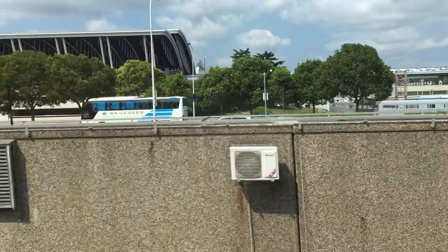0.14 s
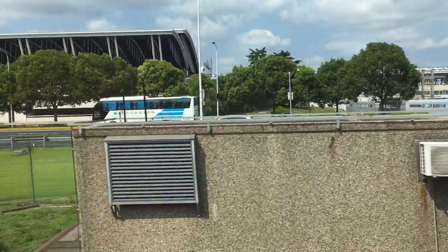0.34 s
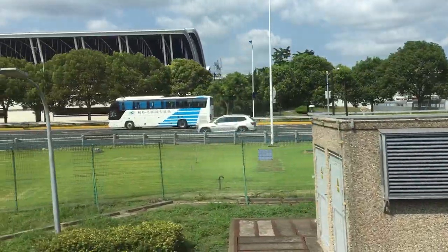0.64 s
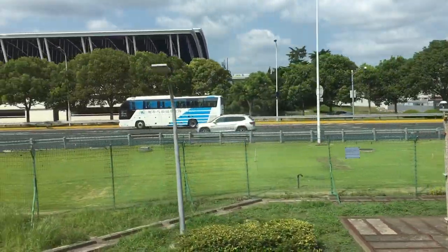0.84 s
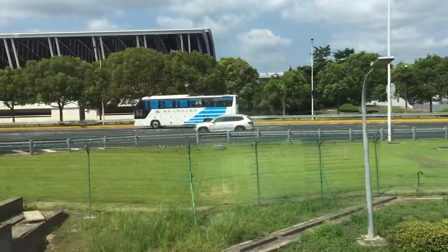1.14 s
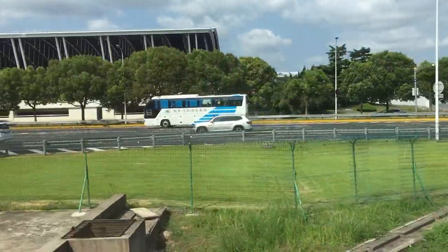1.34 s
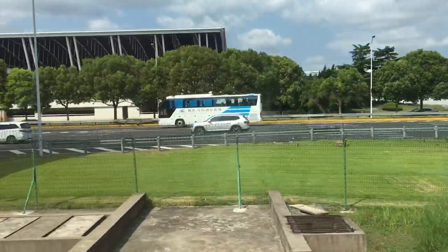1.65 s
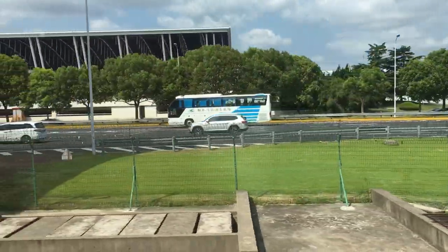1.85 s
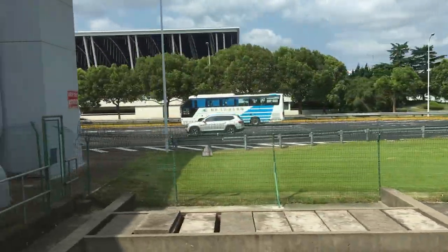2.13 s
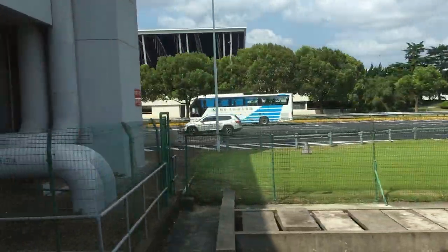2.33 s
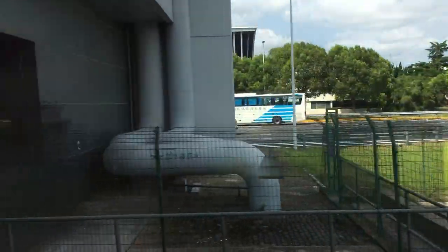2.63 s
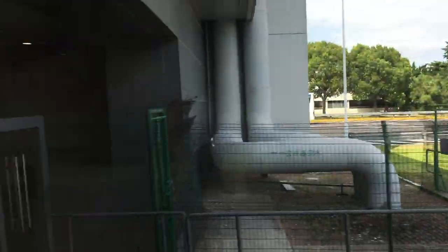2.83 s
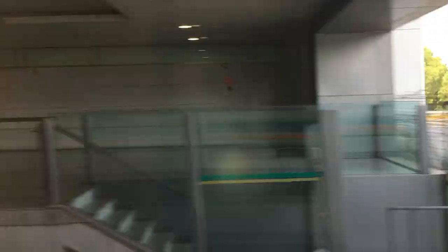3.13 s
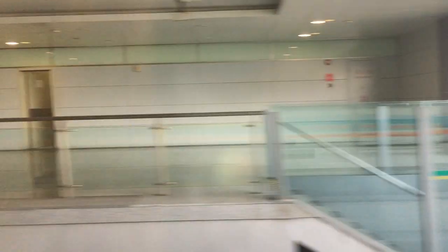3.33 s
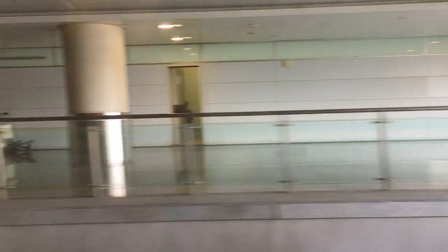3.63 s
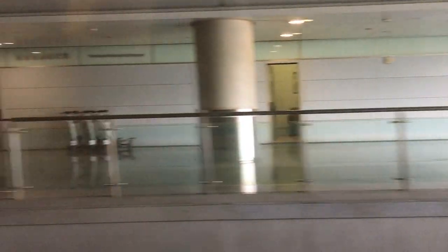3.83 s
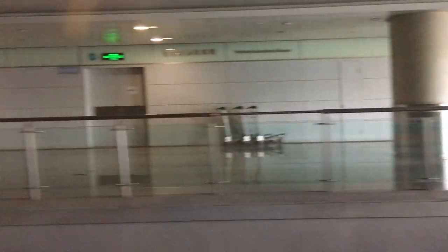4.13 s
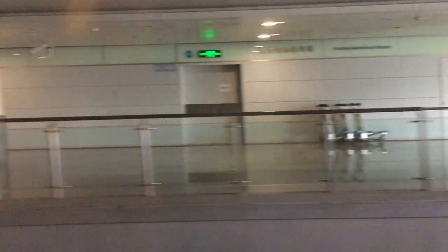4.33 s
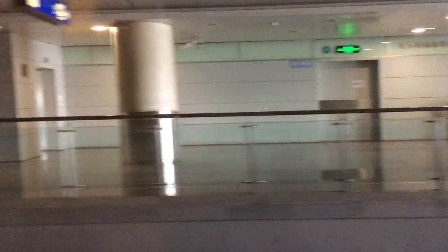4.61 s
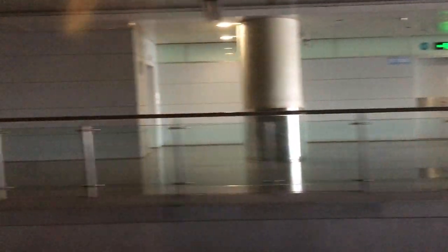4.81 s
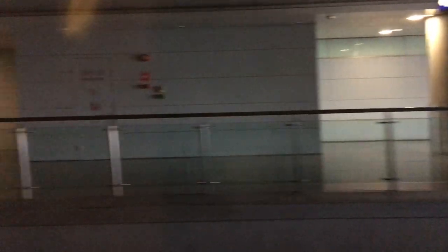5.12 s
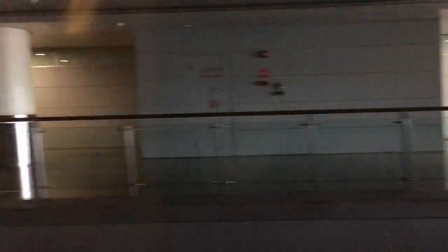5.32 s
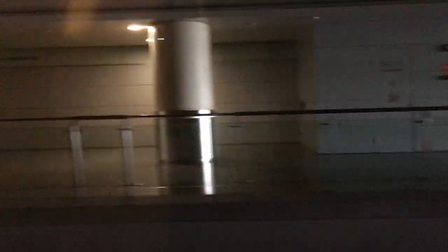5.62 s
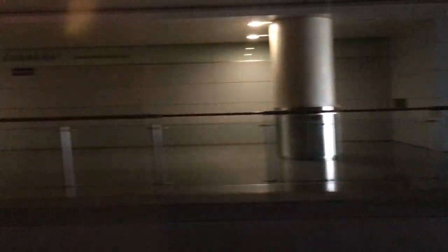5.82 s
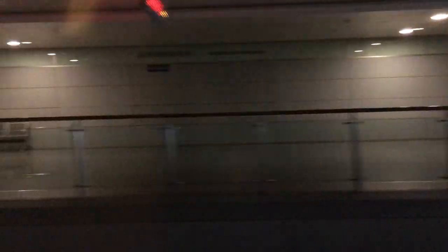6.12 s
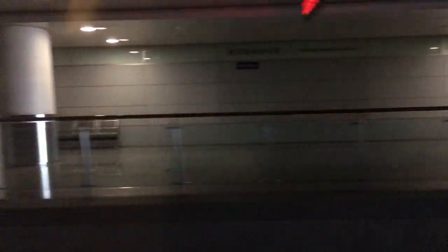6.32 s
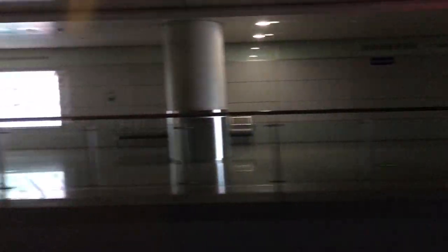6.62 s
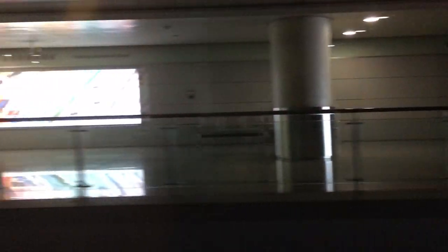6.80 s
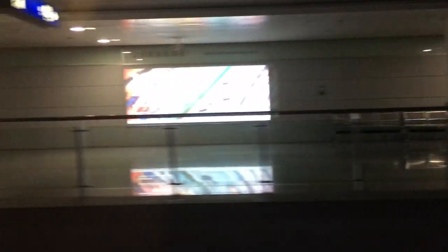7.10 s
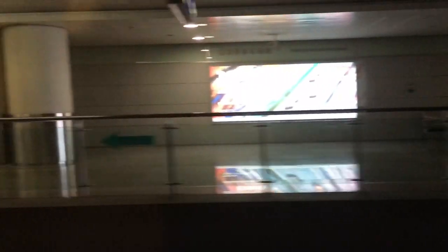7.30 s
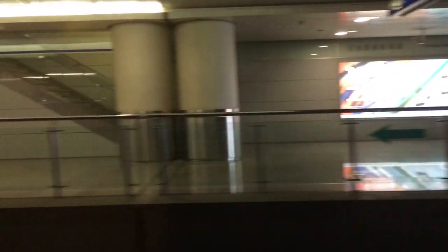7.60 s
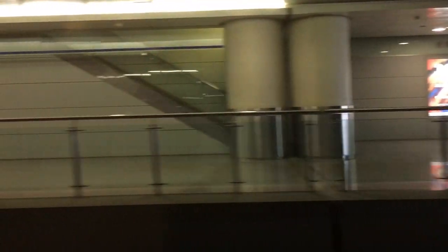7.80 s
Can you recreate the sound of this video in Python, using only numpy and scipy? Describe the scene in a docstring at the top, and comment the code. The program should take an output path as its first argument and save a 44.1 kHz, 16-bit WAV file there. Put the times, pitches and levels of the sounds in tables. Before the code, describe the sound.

The sound is heard from inside a magnetically levitated train carriage as it brakes into a station. From 0 seconds a deep floor rumble, strongest in the low bass, sits with nearly steady, dull cabin air. Over it a low hum falls slowly and smoothly in pitch, by roughly a quarter over the eight seconds. A trim panel gives very faint, short, high squeaks about a dozen times a second, varying in strength. Light cloth rustles appear at 0.6 and 1.5 seconds. At about 2.3 the panel slides a little longer, its thin tone rising, followed by a cluster of crisp fabric rubs until 2.6. From about 2.5 to 4.5 station walls throw back a swelling, muffled rush, which then stays, easing slightly after 6. The hum grows more unsteady, pulsing and dipping, especially after 4. Scattered close rustles and snaps continue until the end, with the train still moving.

```python
"""Inside a magnetically levitated train braking into a station, heard at one microphone in the carriage.
From the start the floor rumbles over cabin air noise, and the guideway's stator slots hum at a falling
pitch, as sine orders; a trim panel squeaks a dozen times a second in short tones, and cloth close to the
microphone rustles in shaped noise. At 2.3 s the panel slides for longer. Over the first five seconds the
station walls throw back ever more running noise, filtered hiss, and the hum grows more unsteady."""
import sys
import numpy as np
from scipy import signal
from scipy.fft import rfft, irfft, next_fast_len
from scipy.io import wavfile
from scipy.ndimage import uniform_filter1d, map_coordinates

SR = 44100
rng = np.random.default_rng(int(sys.argv[2]) if len(sys.argv) > 2 else 0)


def decibels_to_gain(level_db):
    """Convert a level in decibels to a linear amplitude gain (20 dB per decade)."""
    exponent = np.asarray(level_db, float) / 20
    return 10 ** exponent


def generate_wav(signal):
    """Clip the signal to [-1, 1] and save it as 16-bit WAV at the path in sys.argv[1]."""
    frames = np.transpose(np.atleast_2d(signal))
    scaled = np.clip(frames, -1, 1) * 32767
    pcm = np.round(scaled).astype(np.int16)
    wavfile.write(sys.argv[1], SR, pcm)


N = 350594

# Running noise thrown back by the station walls. Each row: time in seconds, level in dB.
WALL_LEVEL = [(0, -71.5), (2.5, -51), (3, -47.5), (3.5, -42.5), (4, -40.5), (4.5, -37.5), (5, -38),
              (5.5, -38), (6, -39), (6.5, -42.5), (7, -42), (7.5, -44.5), (7.95, -42)]
SQUEAK_HZ = 4350


def unit(x):
    """Scales a sound to rms 1."""
    return x / np.sqrt(np.mean(x ** 2) + 1e-20)


def curves(rows):
    """Draws one value per sample for each column after the time."""
    s, *columns = np.transpose(rows)
    t = np.arange(N) / SR
    return np.array([np.interp(t, s, column) for column in columns])


def wobble(rate):
    """Draws a smooth random curve through rate random knots a second."""
    knots = rng.standard_normal(int(N * rate / SR) + 4)
    return map_coordinates(knots, [np.arange(N) * rate / SR])


def rush(tone, n=N, peak_hz=1000, peak_db=0):
    """Noise of rms 1 with the given spectrum and one resonant peak."""
    m = next_fast_len(n + 8192)
    octave = np.log2(np.fft.rfftfreq(m, 1 / SR) + 1)
    hz, db = np.transpose(tone)
    width = .16 / (1 + abs(peak_db) / 12)  # octaves; a taller peak is narrower
    peak = peak_db / (1 + ((octave - np.log2(peak_hz)) / width) ** 2)
    shape = np.interp(octave, np.log2(hz), db) + peak
    noise = rng.standard_normal(m)
    return unit(irfft(rfft(noise) * decibels_to_gain(shape), m)[:n])


def hum():
    """Magnets passing the stator slots shake the floor at the slot rate and its first multiples."""
    # Low orders before their dips. Each row: time in seconds, order 1 in dB, order 2 in dB.
    low_orders = [(0, -35.5, -44), (.4, -30, -39.5), (.7, -38.5, -35), (.9, -35.5, -41.5),
                  (1.1, -31.5, -39), (1.7, -33, -45.5), (2.2, -30.5, -39), (2.7, -27.5, -38),
                  (2.95, -29.5, -35.5), (3.15, -29, -47), (3.6, -26, -40), (3.95, -27.5, -47.5),
                  (4.1, -31.5, -31), (4.4, -25, -41), (4.65, -31.5, -34), (5.2, -22, -50.5),
                  (5.3, -36.5, -44.5), (5.45, -25.5, -36), (5.65, -30.5, -46.5), (5.8, -31, -27.5),
                  (5.95, -22, -47), (6.2, -20, -42.5), (6.7, -29, -40), (6.82, -27.5, -47.5),
                  (7, -34, -39.5), (7.2, -23.5, -40.5), (7.3, -31.5, -45.5), (7.55, -29.5, -40.5),
                  (7.8, -24, -39.5), (7.95, -29.5, -61)]
    # Orders 3 and 4. Each row: level through the floor in dB, level relative to the wall echo in dB.
    upper_orders = [(-66.5, -9.5), (-60.5, -12)]
    # Unrest of the hum, growing between the station walls.
    # Each row: time in seconds, scale of the random phase in radians (for order 1).
    unrest_rows = [(0, .2), (3, .25), (4, .4), (5.3, .8), (7.95, .8)]
    start_hz, fall_hz_per_s, ease_hz_per_s2 = 181, 6.75, .093  # the pitch falls ever more gently
    dip_db_per_rad, second_dip_db, upper_waver_db = 10, 4, 3  # order 2 dips deeper by second_dip_db

    t = np.arange(N) / SR
    slot_hz = start_hz - fall_hz_per_s * t + ease_hz_per_s2 * t ** 2
    turn = 2 * np.pi * np.cumsum(slot_hz) / SR
    unrest = curves(unrest_rows)[0]
    walls = decibels_to_gain(curves(WALL_LEVEL)[0])

    gains = []
    for k, db in enumerate(curves(low_orders)):
        depth_db = dip_db_per_rad * unrest + second_dip_db * k
        brief_dips = np.maximum(wobble(20), 0)
        gains.append(decibels_to_gain(db - depth_db * brief_dips))
    for floor_db, echo_db in upper_orders:
        level = np.hypot(decibels_to_gain(floor_db), walls * decibels_to_gain(echo_db))
        gains.append(level * decibels_to_gain(upper_waver_db * wobble(5)))

    out = np.zeros(N)
    for order, gain in enumerate(gains, start=1):
        drift = order ** .75 * unrest * wobble(8 * order)  # higher orders blur more
        flutter_db = (.8 * order + 1.2 * unrest) * np.tanh(wobble(22))
        tone = np.sin(order * turn + drift + rng.uniform(0, 2 * np.pi))
        out += np.sqrt(2) * gain * decibels_to_gain(flutter_db) * tone
    return out


def floor_rumble():
    """The carriage floor rumbles: low noise, strongest around 50 Hz, with a slowly changing level."""
    # Each row: time in seconds, level in dB.
    rumble_level = [(0, -28), (2, -29.5), (2.7, -28), (3.8, -29), (5.2, -26.5), (6.2, -29), (7.95, -29)]
    # Each row: frequency in Hz, relative density in dB per Hz.
    rumble_tone = [(20, -20.5), (28, -21.5), (40, -0.5), (50, 5.5), (65, 2.5), (90, 3.5), (120, -2.5),
                   (150, -12), (200, -28.5), (400, -120)]
    return decibels_to_gain(curves(rumble_level)[0]) * rush(rumble_tone)


def wall_echo():
    """The station walls throw the running noise back, as noise that swells with a slight waver."""
    # Each row: frequency in Hz, relative density in dB per Hz.
    wall_tone = [(150, -31), (280, 6), (450, -10.5), (620, -2), (780, -8), (1100, -7), (2000, -17),
                 (4000, -33.5), (7000, -49.5), (9000, -71), (14000, -120)]
    level_db = curves(WALL_LEVEL)[0] + .6 * wobble(5)
    return decibels_to_gain(level_db) * rush(wall_tone)


def squeaks():
    """Each sway slips the panel on its clip: a short high tone with its octave, then a weaker second slip."""
    # Marker squeaks. Each row: time in seconds, tone in dB rms, octave in dB rms, both before scatter.
    markers = [(.068, -70, -79), (.296, -68, -82), (.38, -77, -84), (.522, -80, -85), (.648, -72, -83),
               (.791, -65.5, -76), (1.172, -68, -80), (1.43, -69.5, -79), (1.92, -68, -79),
               (1.98, -71, -90), (2.209, -70, -80), (2.62, -69.5, -80), (2.773, -69, -80.5),
               (3.41, -67.5, -83), (3.545, -71, -83), (3.7, -66, -74), (3.791, -65, -78), (3.945, -66, -80),
               (4.076, -64, -82), (4.384, -77.5, -85), (4.658, -77, -80), (4.883, -65.5, -71),
               (5.053, -63, -75), (5.375, -68.5, -73), (5.535, -79, -79), (5.79, -65, -88), (6.1, -79, -80),
               (6.427, -78, -82), (6.676, -64, -75), (6.766, -64.5, -73.5), (7.263, -69, -78),
               (7.517, -72, -79), (7.61, -71, -75), (7.932, -66, -74)]
    sway_s, scatter_db = .08, 1.2

    out = np.zeros(N + SR)
    t = np.arange(SR // 20) / SR

    def slip(at, width):
        return np.exp(-((t - at) / width) ** 2)

    # Between two markers the squeaks fall evenly, about one per sway.
    marks = np.array(markers)
    sways = np.maximum(1, np.round(np.diff(marks[:, 0]) / sway_s))
    number = np.append(0, np.cumsum(sways))
    every = np.arange(number[-1] + 1)
    rows = np.transpose([np.interp(every, number, column) for column in marks.T])
    chances = rng.standard_normal((len(rows), 5))
    for (s, db, octave_db), (detune, late, start, a, b) in zip(rows, chances):
        turn = 2 * np.pi * SQUEAK_HZ * (1 + .002 * detune) * t + start
        second = .027 + .002 * late  # seconds into the squeak
        low_swell = slip(.014, .0047) + .4 * slip(second, .003)
        high_swell = slip(.017, .005) + .55 * slip(second, .004)
        low = decibels_to_gain(db + scatter_db * a) * low_swell * np.sin(turn)
        high = decibels_to_gain(octave_db + scatter_db * b) * high_swell * np.sin(2 * turn)
        out[round((s - .015) * SR):][:len(t)] += np.sqrt(2) * (low + high)
    return out[:N]


def slide():
    """Once the panel slides for longer and its tone creeps up, with a rough phase."""
    # One row: middle in seconds, level in dB rms, half length in seconds.
    long_slide = (2.33, -78, .09)
    middle, db, half = long_slide
    t = np.arange(N) / SR - middle
    swell = np.exp(-(t / half) ** 4)
    turn = 2 * np.pi * (1.02 * SQUEAK_HZ * t + 300 * t ** 2)  # rises 600 Hz per second
    return np.sqrt(2) * decibels_to_gain(db) * swell * np.sin(turn + 1.1 * wobble(90))


def rustles():
    """Each rub or snap of cloth near the microphone is a grainy hiss that swells and fades."""
    # Each row: time in seconds, level in dB, half length in seconds, favoured pitch in Hz, its lift in dB.
    rubs = [(0.584, -66, .027, 5500, 9), (1.535, -74.5, 0.29, 9460, 4), (1.847, -81, .07, 8500, 11),
            (2.44, -61.5, 0.017, 12100, 14), (2.447, -56.5, 0.025, 4870, 3),
            (2.48, -61.5, 0.022, 5500, -0.5), (2.487, -63, .012, 2200, 30),
            (2.521, -57.5, 0.035, 8730, 9.5), (2.58, -69, .04, 8800, 3.5), (2.537, -66.5, 0.046, 12200, 16),
            (3.449, -70, 0.037, 6500, 2.5), (3.593, -67.5, 0.09, 9000, -1), (3.718, -64, 0.055, 6400, 9),
            (3.737, -69, 0.034, 3700, 21.5), (3.995, -60, .03, 4830, 15.5), (4.06, -71.5, 0.032, 12600, 6),
            (4.506, -67.5, 0.017, 6300, 9), (4.69, -79, 0.052, 9200, 12), (4.841, -63.5, .045, 9000, -3),
            (4.92, -63.5, .065, 7470, 4.5), (5.62, -76, 0.099, 8500, 0.5), (5.82, -74, .06, 8500, -1),
            (6.332, -65, .04, 8400, 2), (6.568, -60, .02, 8400, 1.5), (6.64, -62.5, .024, 5450, 8.5),
            (7.528, -71.5, 0.057, 9000, 4.5), (7.759, -69, 0.036, 9000, 2), (7.9, -64, .021, 3550, 22)]
    # Sudden at the start. Each row: time in seconds, level in dB, fade in seconds, favoured pitch in Hz.
    snaps = [(2.383, -66.5, .022, 4000), (2.418, -54.5, 0.043, 8800), (3.87, -66.5, 0.049, 9000),
             (4.23, -67.5, 0.016, 7000), (4.32, -70, 0.025, 8500), (5.3, -80, .01, 8000),
             (6.115, -69, .018, 13000), (6.51, -64.5, 0.024, 8000), (6.998, -61, 0.0066, 12000),
             (7.621, -64, 0.017, 7500), (7.863, -60.5, 0.017, 5500)]
    # Each row: frequency in Hz, relative density in dB per Hz.
    cloth_tone = [(1000, -97.5), (2500, -23), (3500, 2.5), (5500, 1), (9000, -5.5), (15500, -18.5)]
    snap_rise_s, snap_lift_db = .003, 6
    rub_lean = 0.98  # below 1, a rub rises faster than it fades
    lead = .3  # seconds of room ahead of each rustle's peak

    n = SR
    out = np.zeros(N + 2 * SR)
    t = np.arange(n) / SR - lead
    rows = [(s, db, half * rub_lean, half / rub_lean, hz, lift_db) for s, db, half, hz, lift_db in rubs]
    rows += [(s, db, snap_rise_s, fade, hz, snap_lift_db) for s, db, fade, hz in snaps]
    for s, db, rise, fade, hz, lift_db in rows:
        swell = np.exp(-np.abs(t / np.where(t < 0, rise, fade)) ** 1.6)
        catches = uniform_filter1d(rng.standard_normal(n), size=40)
        grain = decibels_to_gain(2.9 * unit(catches))  # fibres catch unevenly
        hiss = unit(grain * rush(cloth_tone, n, hz, lift_db))
        out[round(s * SR):][:n] += decibels_to_gain(db) * swell * hiss
    return out[round(lead * SR):][:N]


def cabin_air():
    """Air noise fills the cabin at a nearly steady level."""
    # Each row: frequency in Hz, relative density in dB per Hz.
    cabin_tone = [(80, -25), (140, 1.5), (220, -1.5), (330, -8.5), (430, -18), (680, -20.5), (780, -25.5),
                  (1170, -23), (2000, -32), (3500, -48), (6000, -54.5), (8000, -61), (12000, -67),
                  (16000, -66.5)]
    level_db = -36 + .4 * wobble(4)
    return decibels_to_gain(level_db) * rush(cabin_tone)


def scene():
    """Sums all sources at one microphone."""
    train = hum() + floor_rumble() + wall_echo()
    close = squeaks() + slide() + rustles()
    return (train + close + cabin_air())[None]


def low_pass(x):
    """Removes everything above the highest recorded frequency."""
    return signal.sosfilt(signal.butter(12, 15710, fs=SR, output="sos"), x)


def record(dry):
    """The microphone port colours the sound with its peaks and dips."""
    # Each row: frequency in Hz, gain in dB.
    port_colour = [(750, 0.5), (800, -3.5), (890, -0.5), (1000, -2.5), (1300, -6), (1450, -3.5),
                   (1600, -5.5), (2250, -4.5), (2750, 1.5), (2950, -1.5), (4300, 2.5), (4900, -1),
                   (5250, 2), (6900, 0.5), (7200, -1.5), (9600, 1.5), (10400, -3.5), (11200, 0.5),
                   (13000, 2), (13400, -2)]
    edge = SR // 10  # the sound is mirrored on past both ends, so the filter meets no sudden edge
    running = np.pad(dry, ((0, 0), (edge, edge)), mode="reflect", reflect_type="odd")
    m = next_fast_len(N + 2 * edge)
    hz, db = np.transpose(port_colour)
    octave = np.log2(np.fft.rfftfreq(m, 1 / SR) + 1)
    colour = decibels_to_gain(np.interp(octave, np.log2(hz), db))
    mix = irfft(rfft(running, m) * colour, m)[:, edge:edge + N]
    return low_pass(mix)


dry = scene()
out = record(dry)
generate_wav(out)
```